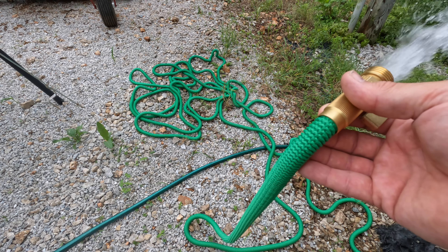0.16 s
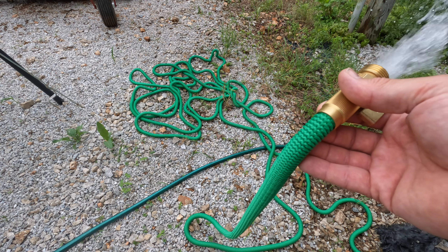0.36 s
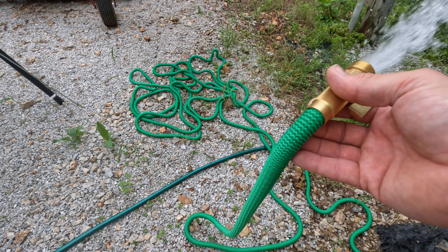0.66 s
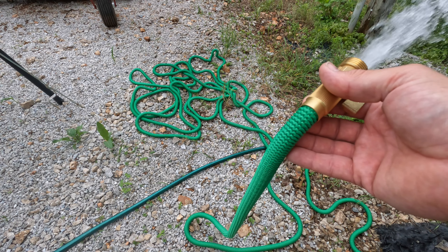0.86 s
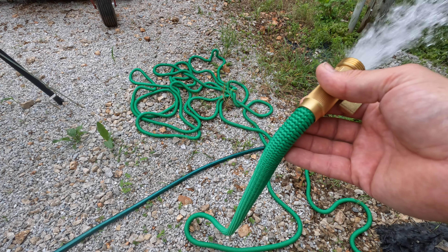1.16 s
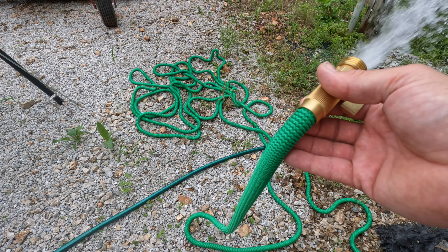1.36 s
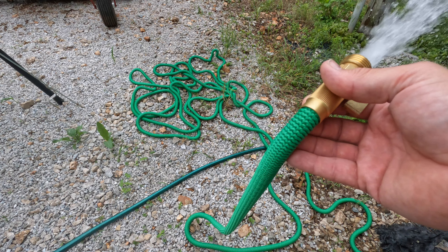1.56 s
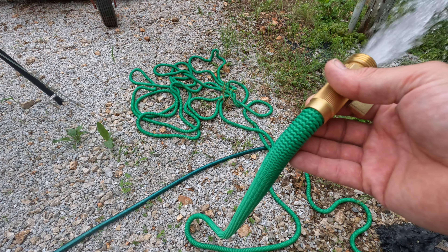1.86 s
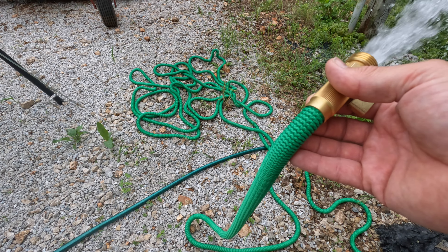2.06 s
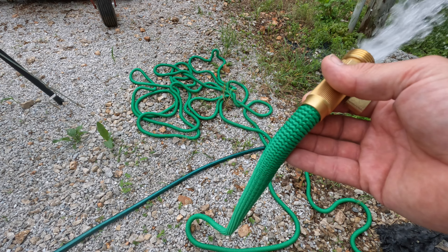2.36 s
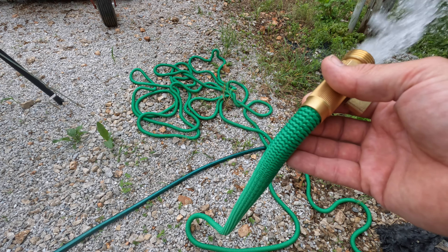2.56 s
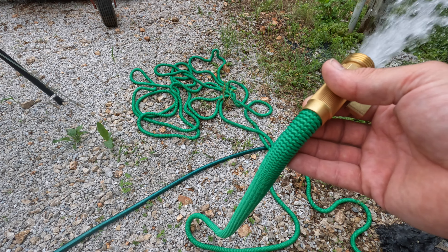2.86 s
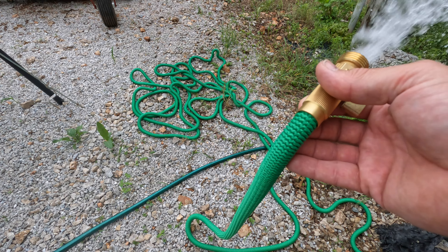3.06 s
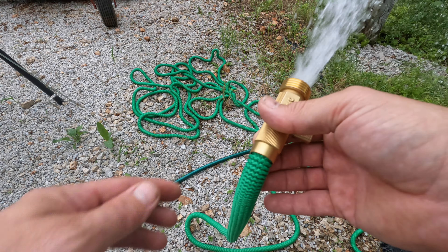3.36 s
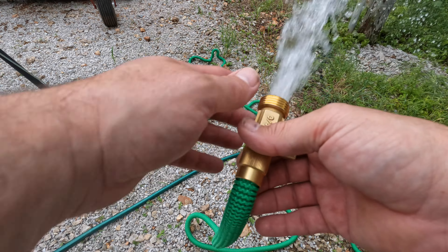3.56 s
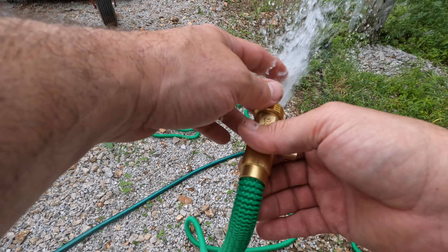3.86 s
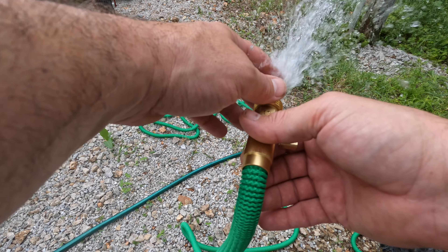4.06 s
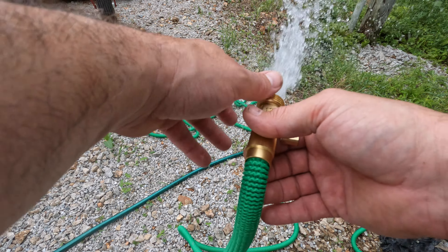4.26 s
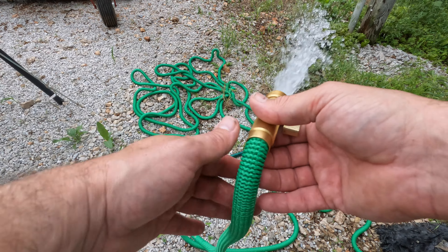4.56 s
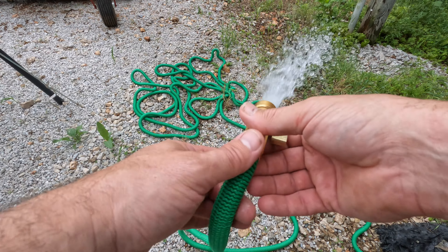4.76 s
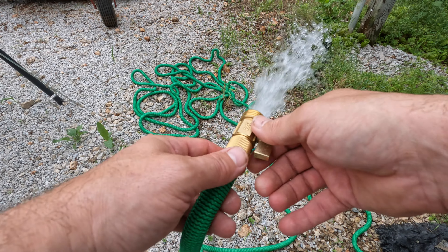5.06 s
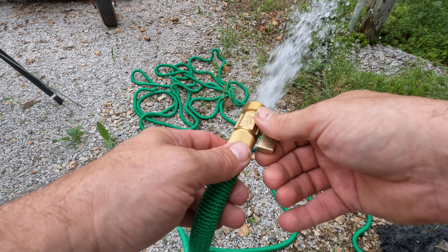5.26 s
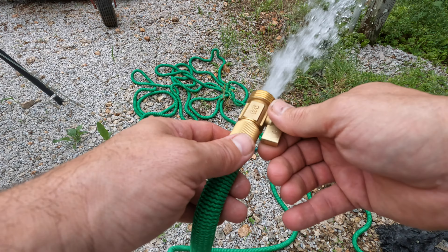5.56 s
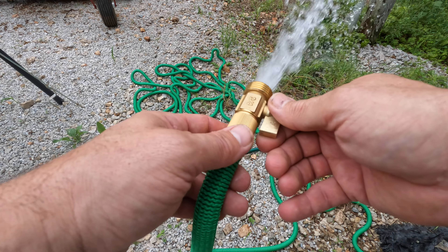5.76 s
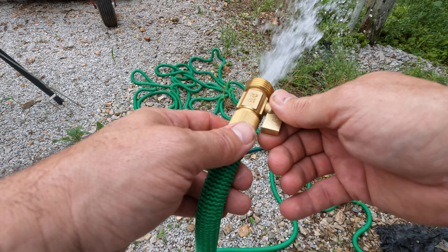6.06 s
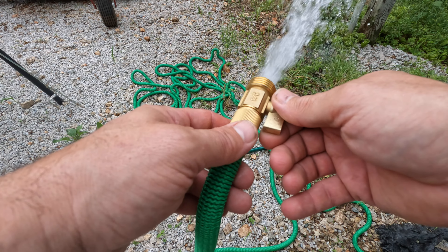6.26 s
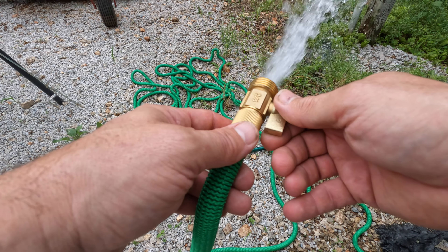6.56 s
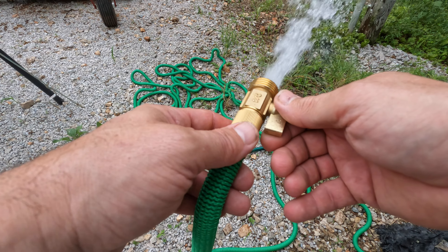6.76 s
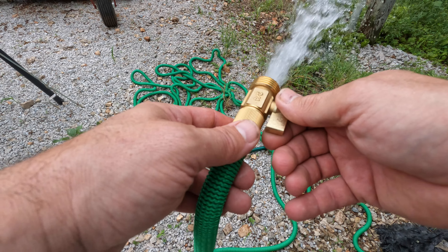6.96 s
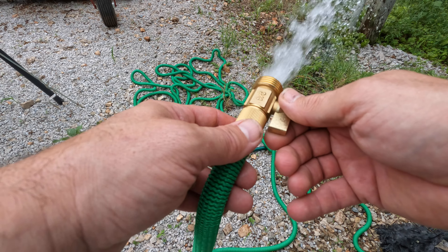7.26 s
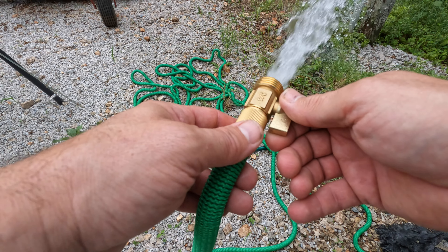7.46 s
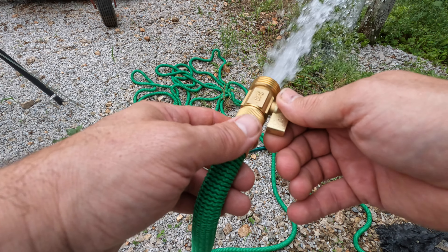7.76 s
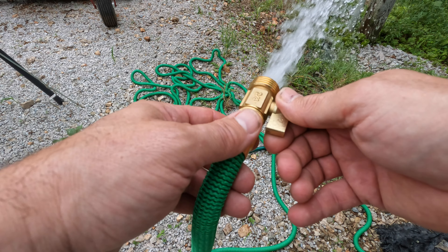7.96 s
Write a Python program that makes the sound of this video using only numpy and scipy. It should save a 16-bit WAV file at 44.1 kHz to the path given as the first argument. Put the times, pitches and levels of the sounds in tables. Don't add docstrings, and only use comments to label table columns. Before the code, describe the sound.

A continuous, bubbling hose spray heard very close, bright and rough with small popping air pockets. It starts with a slightly ringing tone to the right, swells as fingers reach into the stream, drops back abruptly and continues nearer the centre with a higher colour. Underneath are distant patter on gravel, wet slaps, low hose rumble, light air and a barely audible hum.

```python
import sys
import numpy as np
from scipy import signal
from scipy.fft import rfft, irfft, next_fast_len
from scipy.io import wavfile
from scipy.ndimage import uniform_filter1d, map_coordinates

SR = 44100
rng = np.random.default_rng(int(sys.argv[2]) if len(sys.argv) > 2 else 0)


def file_out(sig):
    cols = np.atleast_2d(sig).T
    lim = np.clip(cols, -1, 1)
    pcm = np.round(lim * 32767).astype(np.int16)
    wavfile.write(sys.argv[1], SR, pcm)


def level_to_linear(level):
    exponent = np.asarray(level, float) / 20
    return 10 ** exponent


N = 358533


# time in seconds, level in dB.
JET_LEVEL = [(0, -25), (3.17, -24.5), (3.42, -23), (3.5, -24), (3.78, -21.5), (3.82, -24), (3.92, -19.5),
             (4.32, -19.5), (4.37, -25), (4.8, -24.5), (5.05, -23.5), (6.59, -23), (6.66, -20.5),
             (6.75, -25.5), (7.0, -23.5), (7.22, -24.5), (7.36, -23), (8.13, -24.5)]


def jet():
    sputter_db = 1.58 * wobble(800) + 0.23 * wobble(200) + 0.5 * wobble(60) + 0.51 * wobble(9)
    tear = unit(patchy(1.96, tall=18, long=2) * level_to_linear(sputter_db))
    fine_drops = droplets(count=26000, cycles=2.25, spread_db=3.5)
    sharp_drops = droplets(count=1500, cycles=0.75, spread_db=3.0)
    tear[0] = 0.87 * tear[0] + 0.4 * fine_drops + 0.19 * sharp_drops

    events = pockets()
    steady = level_to_linear(curves(JET_LEVEL)[0] + 0.21)
    tear = tear * np.hypot(steady, pocket_lift(events))
    spray = shaped(tear, jet_colour)
    spray[0] += bursts(events, cycles=2.5, gain_db=-6.5, scatter=0.11)
    return shaped(ports(spray), port_shadow)


def droplets(count, cycles, spread_db):
    when, pitch, size, phase = rng.random((count, 4)).T
    hz = 1500 + 13500 * pitch[:, None] ** 0.8
    t = np.arange(96) / SR
    life_s = np.minimum(cycles / hz, 0.0006)
    size = level_to_linear(-spread_db * np.log(1 - 0.995 * size))[:, None] / np.sqrt(life_s)
    envelope = size * t / life_s * np.exp(-t / life_s)
    ticks = envelope * np.sin(2 * np.pi * (hz * t + phase[:, None]))
    at = (when * N).astype(int)[:, None] + np.arange(96)
    return unit(np.bincount(at.ravel(), ticks.ravel(), N + 96)[:N])


# time in seconds, peak in dB, pitch in Hz.
LARGE_POCKETS = [(0.3606, -10, 4060), (0.9916, -12, 3740), (1.0929, -7, 3730), (1.1453, -13, 3690),
                 (1.9619, -12, 4140), (2.6893, -10, 3680), (3.4174, -9, 4660), (3.6654, -10, 4850),
                 (4.0023, -5, 2980), (4.0324, -8, 3930), (4.1016, -7, 2970), (4.563, -8, 4360),
                 (4.7112, -9, 4260), (4.9935, -7, 4940), (5.0469, -5, 5210), (5.0804, -9, 4490),
                 (5.1218, -9, 4620), (5.1672, -10, 4660), (5.3602, -7, 3990), (5.6406, -11, 4460),
                 (5.8584, -10, 3920), (5.9753, -9, 4060), (6.1604, -8, 4130), (6.4762, -10, 4950),
                 (7.1207, -10, 4440), (7.3931, -8, 4510), (7.5797, -8, 5100), (7.7538, -9, 4670),
                 (7.7992, -8, 5040), (8.0147, -8, 5040)]


def pockets():
    sideways_hz, upright_hz = 3750, 4700
    small_count, small_db, small_spread_db = 60, -13, 3.5
    when, size, pitch = rng.random((small_count, 3)).T
    s = when * N / SR
    hz = (sideways_hz + (upright_hz - sideways_hz) * held(s)[0]) * (0.97 + 0.16 * pitch)
    db = small_db + small_spread_db * np.log(1 - 0.95 * size)
    return list(LARGE_POCKETS) + list(zip(s, db, hz))


def pocket_lift(events):
    lift_db, life_s = -12.5, 0.0013
    lift = np.zeros(N + SR)
    t = np.arange(SR // 50) / SR
    swell = t / life_s * np.exp(1 - t / life_s)
    for s, db, hz in events:
        lift[round(s * SR):][:len(t)] += level_to_linear(db + lift_db) * swell
    return lift[:N]


# frequency in Hz, level in dB per Hz.
SIDEWAYS = [(290, -41), (500, -22.5), (927, -24.5), (1410, -17), (2070, -4), (2360, -15.5), (3010, -3),
            (3740, -3.5), (4380, -3), (6000, -6.5), (6830, -11), (8480, -11.5), (10100, -23),
            (12300, -20.5), (15500, -45)]
UPRIGHT = [(290, -16), (500, -20.5), (927, -8.5), (2010, -23.5), (2970, -4.5), (3380, -10), (4380, -1),
           (4980, 1), (6090, -13), (7560, -11.5), (9510, -16.5), (10800, -21), (12100, -24), (13400, -30),
           (15500, -43)]
FINGERS = [(290, -36), (500, -16), (716, -42), (1010, -18), (1240, -18), (1490, -5), (3150, 3), (4440, -4),
           (5590, -5), (6270, -4.5), (7560, -0.5), (8240, -11), (10500, -12), (13600, -22), (15500, -44)]
# centre in Hz, half width in
# Hz, gain in dB.
KNUCKLES = [(1960, 82, -2.5), (2520, 140, 9), (3960, 200, 3), (4540, 270, 1.5), (5560, 260, -3),
            (6040, 150, 0), (7740, 400, 0.5)]
UPRIGHT_RIPPLES = [(4040, 120, 1.5), (4970, 140, -0.5), (7940, 160, 2), (8500, 326, -1.5), (11200, 360, 0.5),
                   (12000, 300, -10.5)]
# centre in Hz, half width in Hz.
BORE = (3725, 105)
# time in seconds, centre in Hz, gain in dB.
PALM_NEARS = [
    (3.1, 5800, 3),
    (3.3, 5400, 6),
    (3.43, 5200, 9),
    (3.52, 4700, 4),
    (3.62, 4550, 7),
    (3.73, 4600, 10),
    (3.79, 5200, -7),
    (4.33, 5700, -4),
    (4.42, 6000, 0),
]
# time in seconds, centre in Hz, gain in dB.
PALM_LEAVES = [
    (3.3, 3400, 0),
    (3.6, 3500, -4),
    (3.9, 3600, 0),
    (4.33, 3650, -3),
    (4.42, 3450, -11),
    (4.55, 3300, -13),
    (4.7, 3100, -7),
    (5.05, 3000, -4),
]
# time in seconds, centre in Hz, gain in dB.
WRIST = [
    (4.5, 9800, 3),
    (4.6, 9000, -1),
    (4.68, 7700, -4),
    (4.8, 8400, -5),
    (4.95, 9400, -3),
    (5.2, 9800, 1.5),
]


def jet_colour(hz, s):
    ring_db, ring_wander_hz = 8, 45
    upright, fingers, _ = held(s)
    wander_hz = ring_wander_hz * np.interp(s, np.arange(N) / SR, wobble(4))
    sideways = along(SIDEWAYS, hz) + sum(db * bell(hz, c, w) for c, w, db in KNUCKLES)
    raised = along(UPRIGHT, hz) + sum(db * bell(hz, c, w) for c, w, db in UPRIGHT_RIPPLES)
    free = (1 - upright) * sideways + upright * raised
    db = (1 - fingers) * free + fingers * along(FINGERS, hz)
    db = db + ring_db * (1 - upright) * (1 - fingers) * bell(hz - wander_hz, *BORE)
    db = db + echo(PALM_NEARS, hz, s, 340) + echo(PALM_LEAVES, hz, s, 180) + echo(WRIST, hz, s, 550)
    return db - 10 * np.log10(np.mean(level_to_linear(db) ** 2, axis=0))


def echo(rows, hz, s, width_hz):
    when, centre_hz, db = np.transpose(rows)
    return np.interp(s, when, db) * bell(hz, np.interp(s, when, centre_hz), width_hz)


# time in seconds, turned upright 0-1, fingers in the jet 0-1,
# place left-right in dB.
HANDS = [(0, 0.22, 0.13, -13), (1, 0.03, 0, -11), (3.05, 0.15, 0.09, -13), (3.45, 0.1, 0.3, -11.5),
         (3.62, 0.4, 0.76, -7), (3.8, 0.1, 0.64, -4), (4.33, .5, 0.63, -2), (4.38, 0, 0.7, -4),
         (4.48, 0.2, 0.45, -4.5), (4.58, 0.4, 0.08, -6), (4.8, 0.47, 0.06, -7), (5, 0.53, 0, -6),
         (5.8, 0.96, 0.16, -6), (7.2, 1, 0.16, -6.5), (8.13, 0.94, 0.16, -7)]


def held(s):
    when, upright, fingers, place_db = np.transpose(HANDS)
    upright = np.interp(s, when, np.clip(upright, 0, 1))
    fingers = np.interp(s, when, np.clip(fingers, 0, 1))
    return upright, fingers, np.interp(s, when, place_db)


# frequency in Hz, share of the left-right place.
SHADOW = [(200, 0.3), (700, 0.32), (2400, 0.46), (4400, 0.25), (8600, 0.43), (10200, 0.13), (15000, 0.22)]


def port_shadow(hz, s):
    shadow_db = along(SHADOW, hz) * held(s)[2]
    return np.array([shadow_db / 2, -shadow_db / 2])


# time in seconds, splash level in dB.
LANDING = [(0, -39), (1.4, -40.5), (3.2, -38.5), (3.58, -39), (3.64, -34.5), (4.33, -36), (4.7, -39),
           (6.28, -39.5), (6.36, -36.5), (6.66, -37.5), (6.74, -38.5), (8.13, -39.5)]
# time in seconds, peak in dB, pitch in Hz.
SLUGS = [(0.028, -22, 1470), (0.866, -19, 910), (0.962, -19, 1180), (1.183, -28, 1250), (2.64, -16, 1180),
         (2.875, -23, 1220), (2.932, -23, 1240), (3.628, -19, 1370), (3.714, -21, 1410), (3.749, -25, 1500),
         (3.926, -32, 1410), (4.284, -13, 1106), (4.342, -23, 1300), (4.711, -21, 1380), (4.95, -17, 1000),
         (5.436, -21, 1090), (5.507, -17, 920), (6.333, -20, 990), (6.385, -13, 930), (6.47, -11.5, 1110),
         (6.674, -11, 1030), (6.729, -15, 1000), (6.91, -28, 930), (7.063, -22, 985), (7.162, -24, 1250),
         (7.213, -25, 1040), (7.341, -16, 915), (7.643, -14, 1020), (7.733, -12, 1480),
         (7.972, -14.5, 1050)]
# frequency in Hz, level in dB per Hz.
SPLASH = [(300, -48), (480, -40), (700, -10.5), (950, 0), (1400, -1), (2200, -1), (4000, -69)]


def splash():
    thud_hz, thud_db = 260, -23
    patter_db = 1.5 * wobble(150) + 0.66 * wobble(45) + 0.2 * wobble(12)
    patter = patchy(1.33, tall=3, long=7) * level_to_linear(patter_db)
    patter = level_to_linear(curves(LANDING)[0] + 1.5) * coloured(patter, SPLASH)
    thuds = [(s, db, thud_hz) for s, db, hz in SLUGS]
    patter[0] += bursts(SLUGS, cycles=1.6, gain_db=-10, scatter=0.13)
    patter[0] += bursts(thuds, cycles=0.89, gain_db=thud_db, scatter=0.294)
    return ports(patter) * level_to_linear([[-1.2], [1.2]])


# frequency in Hz, level in dB per Hz.
RUMBLE = [(100, -53), (135, -7), (165, -2), (192, 2.5), (230, -0.5), (300, -5), (400, -9), (500, -13.5),
          (620, -7), (810, -13), (1300, -90)]
BREEZE = [(12, -30), (22, -2), (32, 0.5), (60, 0), (100, -3), (140, -5), (200, -30)]
# frequency in Hz, level in dB rms.
HUM = [(59.5, -67), (120, -60)]


def yard():
    near_db = curves(LANDING)[0]
    rumble_db = -45.5 + 0.49 * (near_db - near_db.mean()) + 0.27 * wobble(9.3) + 0.8 * wobble(25)
    rumble = level_to_linear(rumble_db + 1.5) * coloured(patchy(1.0, tall=3, long=9), RUMBLE)

    gust_db = 1.8 * wobble(2.4) + 1.7 * wobble(10)
    breeze = level_to_linear(-53.5 + gust_db) * coloured(patchy(0.96, tall=3, long=9), BREEZE)

    t = np.arange(N) / SR
    hum = np.zeros(N)
    for hz, db in HUM:
        level = np.sqrt(2) * level_to_linear(db + 2.3 * wobble(3.47))
        hum += level * np.sin(2 * np.pi * hz * t + 0.5 * wobble(2.64))
    return (ports(rumble + breeze) + hum) * level_to_linear([[-0.45], [0.45]])


# frequency in Hz, left-right correlation.
ALIKE = [(30, 0.9), (70, 0.7), (180, .99), (350, 0.88), (700, 0.9), (4000, 0.95), (9000, .92), (13000, 0.4)]


def ports(pair):
    def share(hz):
        turn = np.arccos(np.clip(along(ALIKE, hz), -1, 1)) / 2
        return np.array([np.cos(turn), np.sin(turn)])

    mid, side = filtered(pair, share)
    return np.array([mid + side, mid - side])


def bursts(events, cycles, gain_db, scatter):
    out = np.zeros(N + SR)
    for (s, db, hz), draw in zip(events, rng.standard_normal((len(events), 10))):
        turns = np.arange(int(5 * cycles * SR / hz)) * hz / SR
        swell = turns / cycles * np.exp(1 - turns / cycles)
        partials = [np.sin(2 * np.pi * turns * (1 + scatter * d) + 3 * p) for d, p in draw.reshape(5, 2)]
        tone = swell * sum(partials)
        out[round(s * SR):][:len(turns)] += level_to_linear(db + gain_db) * tone / np.abs(tone).max()
    return out[:N]


def patchy(depth_db, tall, long):
    z = signal.stft(rng.standard_normal((2, N)), nperseg=128)[2]
    field = uniform_filter1d(rng.standard_normal(z.shape[1:]), tall, 0)
    field = uniform_filter1d(field, long, 1)
    return signal.istft(z * level_to_linear(depth_db * unit(field)), nperseg=128)[1][:, :N]


def shaped(x, gain_db):
    hz, s, z = signal.stft(x, SR, nperseg=512)
    return signal.istft(z * level_to_linear(gain_db(hz[:, None], s)), SR, nperseg=512)[1][:, :N]


def filtered(x, response):
    m = next_fast_len(N + 8192)
    return irfft(rfft(x, m) * response(np.fft.rfftfreq(m, 1 / SR)), m)[..., :N]


def coloured(x, spectrum):
    return unit(filtered(x, lambda hz: level_to_linear(along(spectrum, hz))))


def wobble(rate_hz):
    return map_coordinates(rng.standard_normal(8000), [np.arange(N) * rate_hz / SR], mode="wrap")


def curves(rows):
    s, *cols = np.transpose(rows)
    return [np.interp(np.arange(N) / SR, s, c) for c in cols]


def along(points, hz):
    f, v = np.transpose(points)
    return np.interp(np.log(hz + 1), np.log(f + 1), v)


def bell(hz, centre_hz, width_hz):
    return np.exp(-0.5 * ((hz - centre_hz) / width_hz) ** 2)


def unit(x):
    return x / np.sqrt(np.mean(x ** 2) + 1e-20)


def scene():
    return jet() + splash() + yard()


def band_limit(x):
    return signal.sosfilt(signal.butter(12, 15680, fs=SR, output="sos"), x)


# frequency in Hz, gain in dB.
PORT = [(11300, 0), (12200, 6), (13100, 0), (14000, 1), (15000, 0)]
# frequency in Hz, left lead in radians.
LEAD = [(100, 0.23), (1000, -0.19), (3190, -0.67), (8000, -0.48), (11100, -0.07), (12200, 1.2),
        (12800, 0.81), (15200, 0)]


def record(dry):
    def split(hz):
        left = level_to_linear(along(PORT, hz) / 2) * np.exp(0.5j * along(LEAD, hz))
        return np.array([left, 1 / left])

    x = filtered(dry, split)
    x = x / (1 + np.abs(x / 0.85) ** 4) ** 0.25
    return band_limit(x)


dry = scene()
out = record(dry)
file_out(out)
```